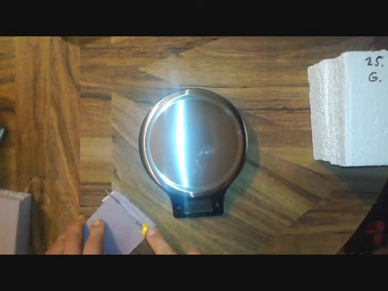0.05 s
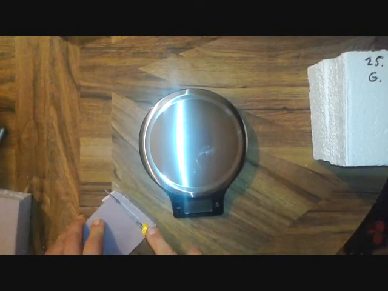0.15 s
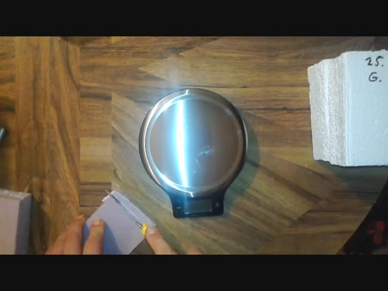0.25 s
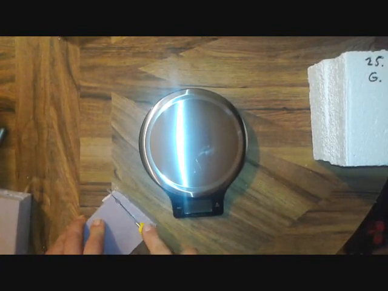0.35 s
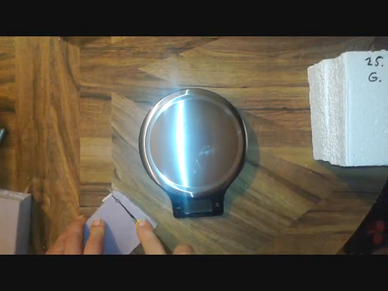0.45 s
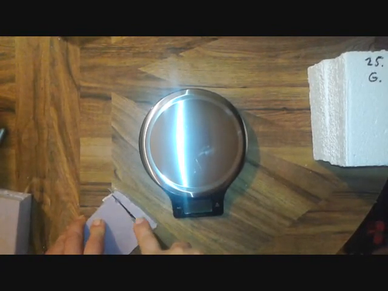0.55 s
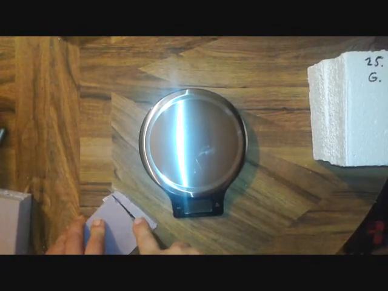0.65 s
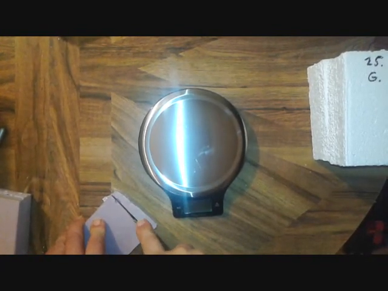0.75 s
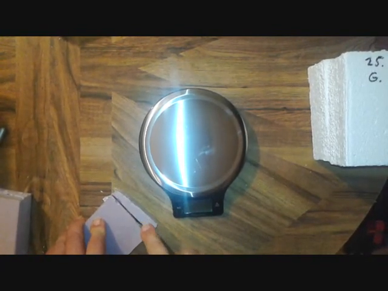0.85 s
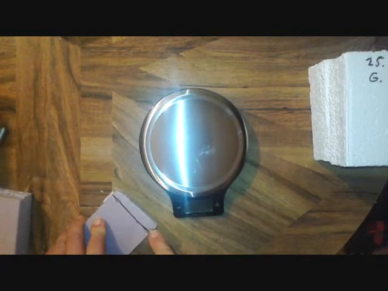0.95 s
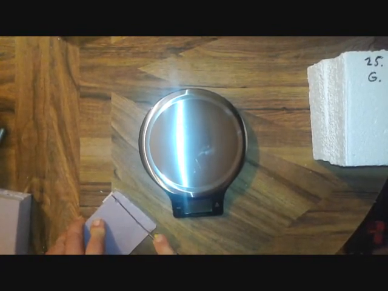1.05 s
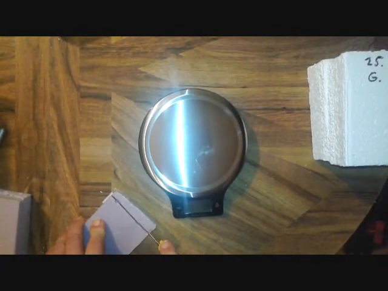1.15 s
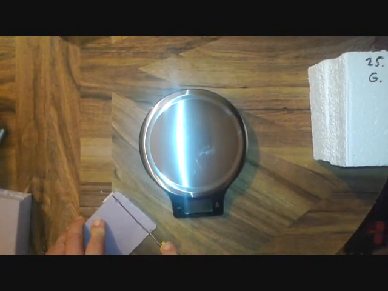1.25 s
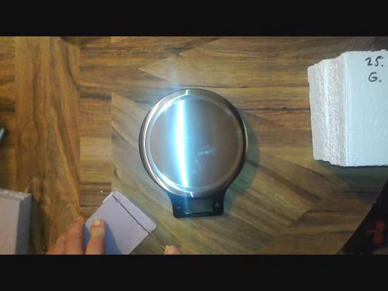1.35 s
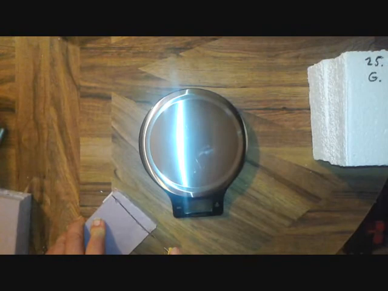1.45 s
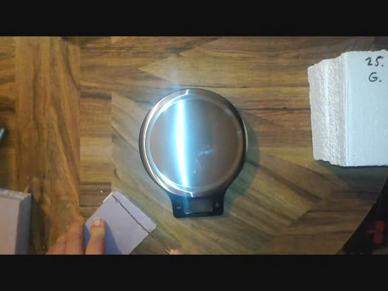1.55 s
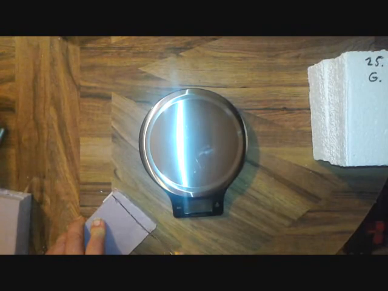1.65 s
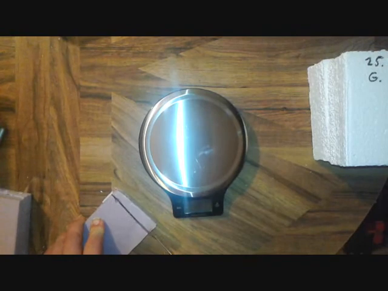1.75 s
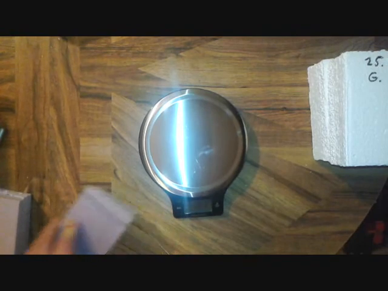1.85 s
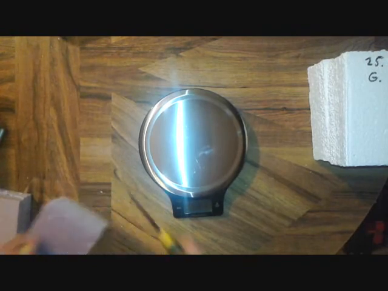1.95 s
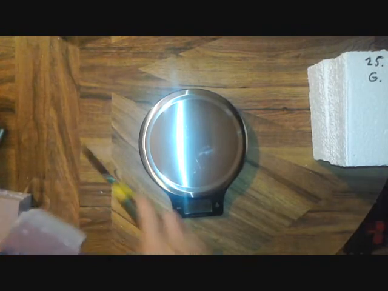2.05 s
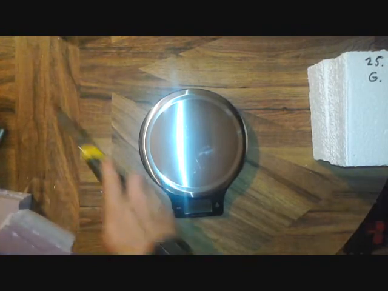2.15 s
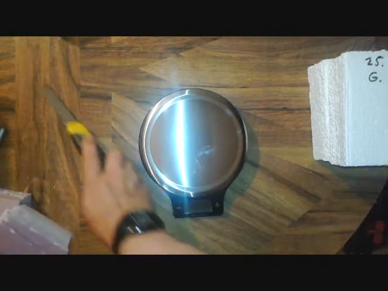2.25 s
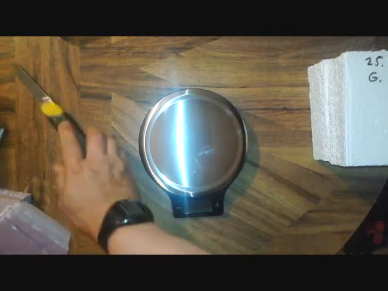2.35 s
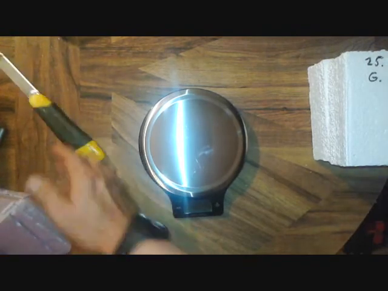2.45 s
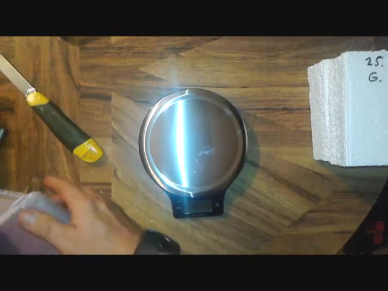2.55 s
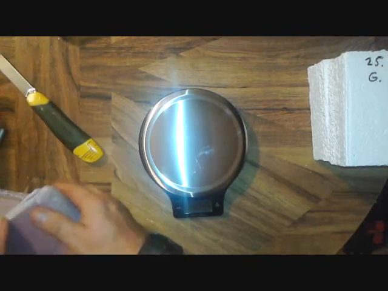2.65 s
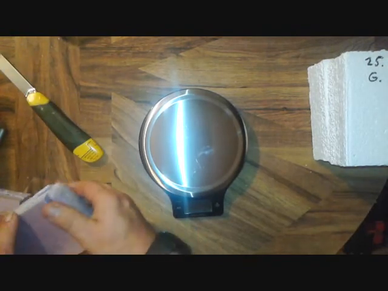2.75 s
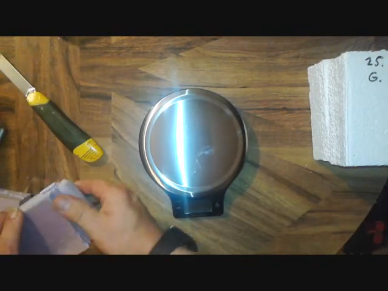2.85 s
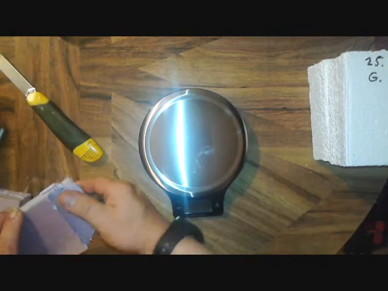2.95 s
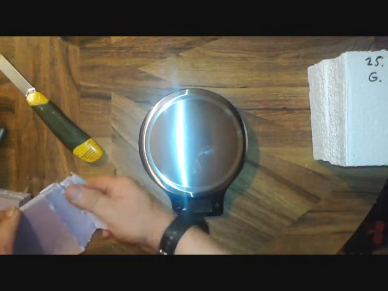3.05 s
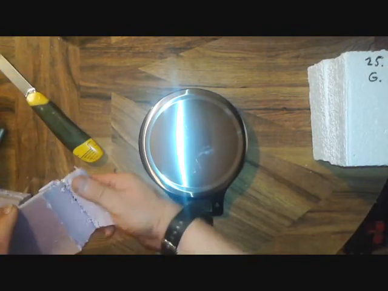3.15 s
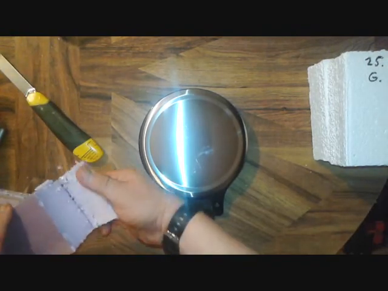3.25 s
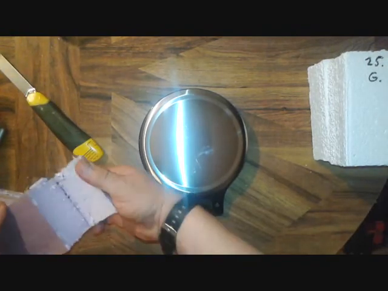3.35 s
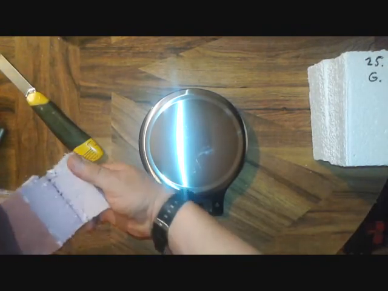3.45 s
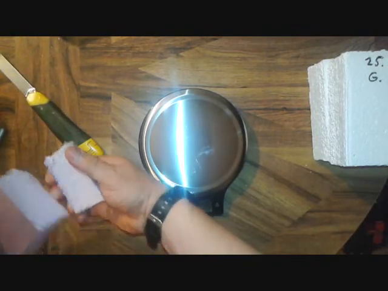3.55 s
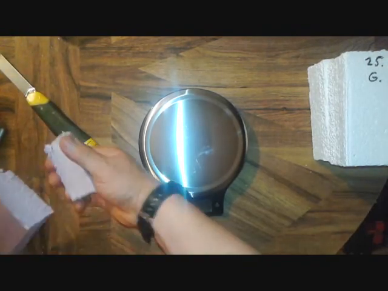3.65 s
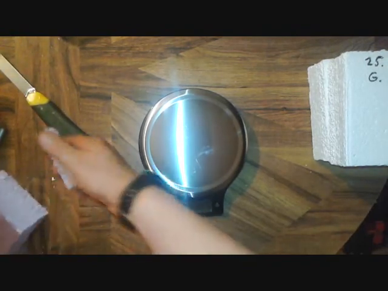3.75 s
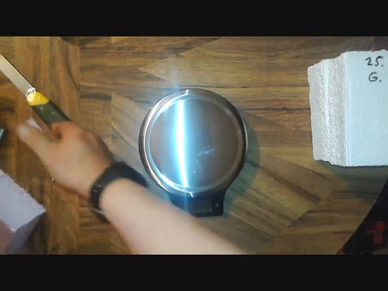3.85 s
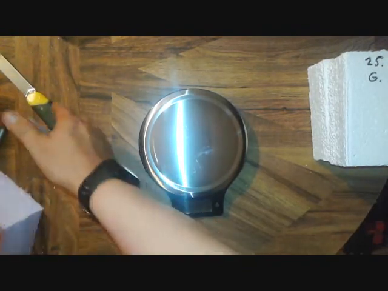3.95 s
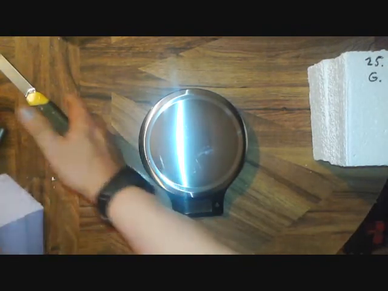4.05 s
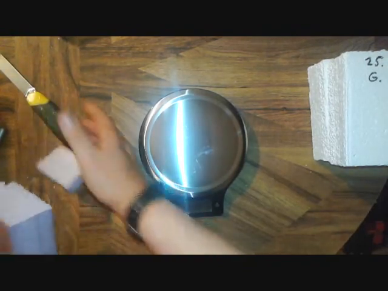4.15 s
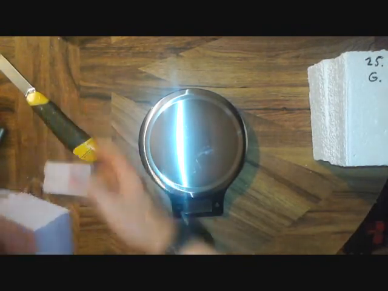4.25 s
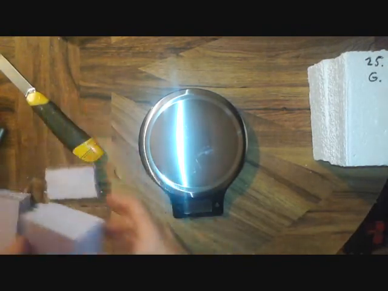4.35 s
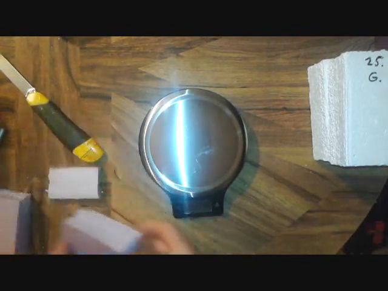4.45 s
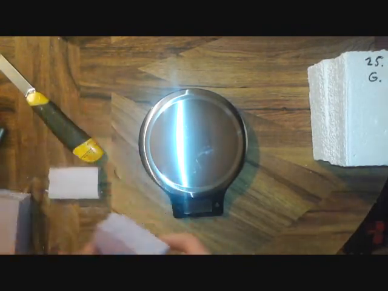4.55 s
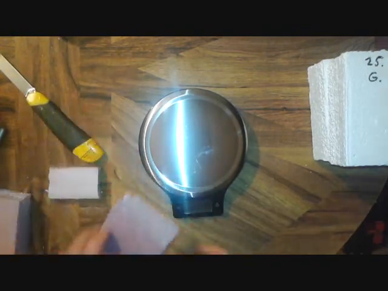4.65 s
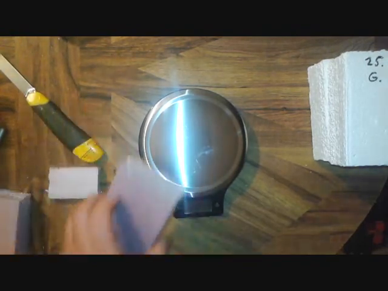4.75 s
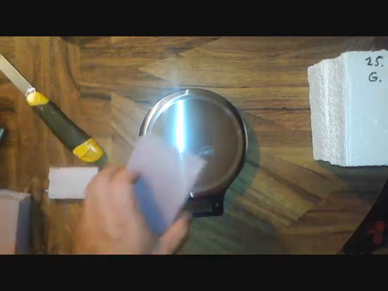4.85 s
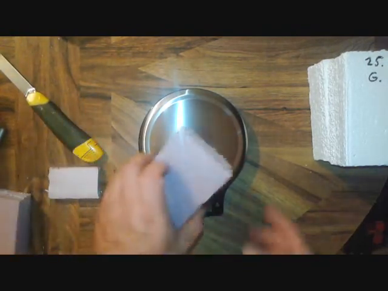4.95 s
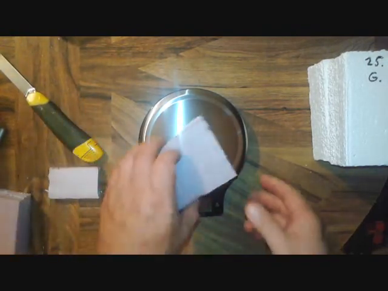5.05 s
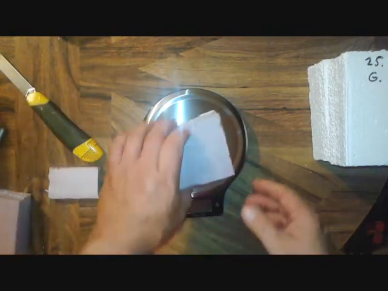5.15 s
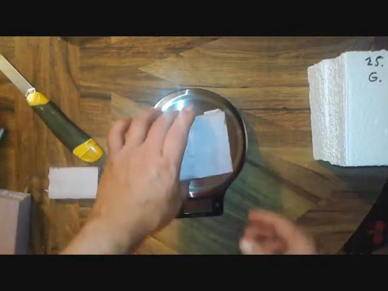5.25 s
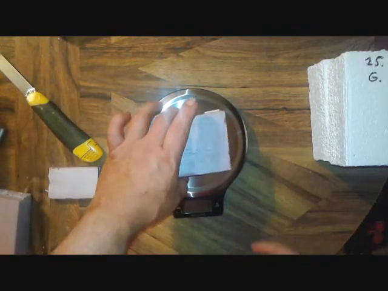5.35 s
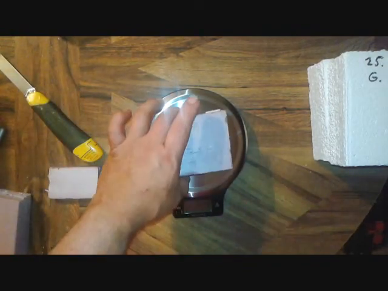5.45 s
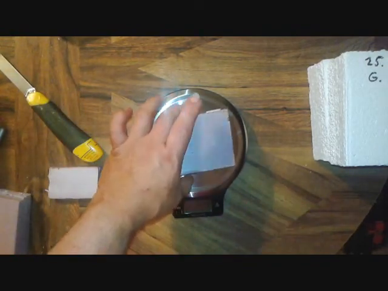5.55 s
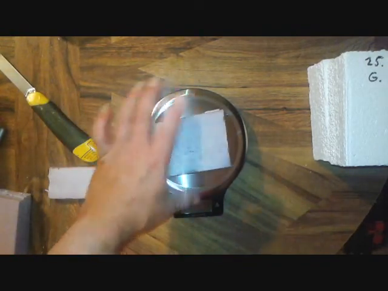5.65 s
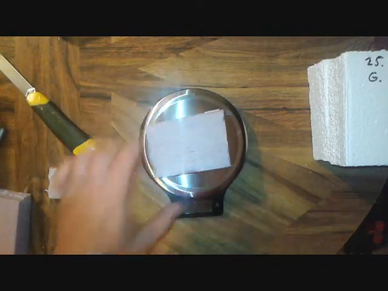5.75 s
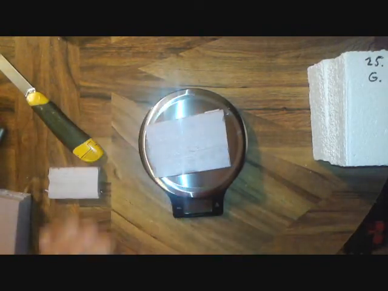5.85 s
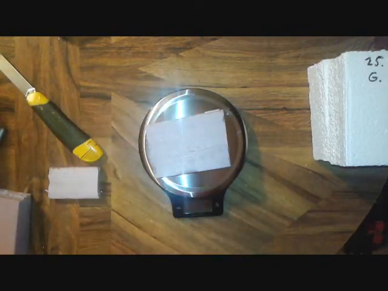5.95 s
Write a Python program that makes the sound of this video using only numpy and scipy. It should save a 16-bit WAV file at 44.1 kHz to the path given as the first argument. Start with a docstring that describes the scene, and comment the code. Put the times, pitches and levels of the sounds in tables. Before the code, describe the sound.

Gritty foam cutting with small crackles, a hard knife clatter on wood, sharp breaking snaps, soft rubbing, and a final clack on a kitchen scale.

```python
"""Wooden table, small room: a utility knife is pulled three times through a dense foam block and laid down with
a clatter; hands snap the slice off, put it aside and drop the block on a glass-topped kitchen scale. Bursting cells
excite foam resonances and snap as short noise bursts; blows ring modes of table, glass, slice, block and scale.
Changing noise echoes answer over a faint hiss; two microphone ports sit above, right of the work."""
import sys
import numpy as np
from scipy import signal
from scipy.fft import rfft, irfft
from scipy.io import wavfile
from scipy.ndimage import uniform_filter1d

SR = 44100
rng = np.random.default_rng(int(sys.argv[2]) if len(sys.argv) > 2 else 0)


def pcm_store(signal):
    """Save signal as 16-bit PCM."""
    levels = np.round(np.clip(np.atleast_2d(signal), -1, 1) * 32767)
    wavfile.write(sys.argv[1], SR, levels.astype(np.int16).T)


N = 264581
T_S = np.arange(N) / SR

# room tone and hiss spectrum: f/Hz, relative density/dB
AIR_SPECTRUM = [(18, -48), (30, -17.5), (89, -6.5), (102, -13.5), (122, -9), (211, -10), (337, -11.5),
                (437, -20), (1830, -26.5), (13900, -32.5), (15000, -40)]
AIR_DB = -68
# where the hands work: t/s, left port delay/ms, left minus right/dB
PLACE = [(0, 0.07, 0), (1.9, 0.13, 0), (2.498, .16, -1.3), (3.598, 0.15, -0.5), (4.199, .18, -1),
         (4.7, 0.17, 0), (5.7, 0.018, 2), (6, 0.019, -1.5)]
SHADE_DB = -2.5  # left port above 7.8 kHz: turned away
EARLY_DB, EARLY_T60_S = -7, .015
ROOM_DB, ROOM_T60_S, ROOM_TOP_HZ = -4, .13, 7000
TOP_HZ = 14550

# blows on the table: t/s, relative level/dB
TABLE_BLOWS = [(0.233, -43), (1.05, -58), (1.885, -38), (2.398, -37.5), (2.534, -33), (2.556, -8.5),
               (2.566, -12), (2.578, -17), (2.599, -20.5), (2.64, -22), (2.669, -29.5)]
TABLE_CONTACT_MS = .4
# table modes: f/Hz, relative level/dB, t60/s
TABLE_MODES = [(153, -5, .45), (188, -19, .35), (263, -4, .15), (322, -8, .1), (348, -3, .17),
               (407, -6, .1), (443, 0, .16), (513, -1, .12), (590, -3, .08), (700, -24, .4), (846, -4, .07),
               (957, -3, .06), (1120, -6, .07)]
# close pair of the scale's glass plate, humming along: f/Hz, relative level/dB, t60/s
GLASS_MODES = [(536, -16, 1.1), (548.5, -17, .9)]
# block lands on the scale: t/s, relative level/dB, contact/ms
SCALE_BLOWS = [(5.745, -31, 0.71), (5.78, -14.5, 0.059), (5.853, -32.5, 0.13)]
# scale modes: f/Hz, relative level/dB, t60/s
SCALE_MODES = [(142, -16, .2), (160, -14, .25), (360, -16, .08), (510, -10, .1), (600, -14, .06),
               (745, -8, .1), (775, -8, .1), (943, -3, .1), (1055, -11, .05), (1230, -11, .04),
               (1833, -12, .06), (2220, -3, .025), (2420, -2, .025), (2660, 1, .03), (3670, -9, .02),
               (4750, -5, .015)]
# cut-off slice put down: t/s, relative level/dB, contact/ms
SLICE_TAPS = [(4.376, -37.5, 0.36), (4.405, -26.5, 0.061), (4.412, -40, 0.13), (4.578, -53, .08)]
# slice modes: f/Hz, relative level/dB, t60/s
SLICE_MODES = [(1240, -8, .045), (1300, -8, .05), (3480, -3, .05), (3560, -2, .05), (4450, -3, .035)]
# block knocks as it is bent and broken: t/s, relative level/dB, contact/ms
BLOCK_KNOCKS = [(3.345, -40.5, 0.33), (3.446, -35, 0.4), (3.475, -30.5, 0.28), (3.664, -40, 0.45),
                (3.703, -39, 0.5), (3.726, -36.5, 0.62), (4.26, -50.5, 0.38), (4.406, -35.5, 0.64),
                (4.646, -41.5, 0.67)]
# block modes: f/Hz, relative level/dB, t60/s
BLOCK_MODES = [(275, -4.5, 0.05), (550, -2.5, 0.028), (750, -0.5, .025)]

# cells snapping, ticks, hard edges of the knife's clatter: t/s, level/dB, f/Hz, treble re tone/dB
CRACKS = [(0.0295, -24.5, 1440, -0.5), (0.0834, -28, 1450, -13), (.1246, -32.5, 2280, -24),
          (0.1312, -32, 1290, -15), (.1471, -22, 3850, -20), (0.1606, -22, 3190, -25),
          (0.2274, -17, 4800, -8), (0.236, -24, 4400, 0), (.2518, -28.5, 4400, 4), (.2613, -32, 2410, -5),
          (0.3536, -33, 2300, -7), (0.4242, -36.5, 2340, -19), (.4324, -28.5, 4120, -22),
          (0.4697, -29, 4160, -17), (0.4862, -29, 2500, -12), (0.5235, -19, 4900, -18),
          (.6482, -23.5, 5060, 2.5), (1.037, -18, 3630, -12), (1.0588, -9, 4700, -16),
          (1.1865, -32, 5040, -4), (1.2462, -18.5, 4660, -9), (1.338, -30, 4630, -15),
          (1.7953, -27.5, 2200, -7), (1.887, -24, 3000, -5), (1.912, -22.5, 2200, -12),
          (1.9546, -12, 4520, -5), (2.0541, -31.5, 4150, -5), (2.18, -38, 3750, -16),
          (2.2091, -26.5, 4130, -4), (2.2189, -28, 2260, -18), (2.4018, -16, 3860, -4.5),
          (2.5323, -21, 3000, -15.5), (2.5567, 2, 2800, -14), (2.578, -3.5, 4940, -10.5),
          (2.5814, -5.5, 3000, -13), (2.6036, -11, 4974, -4), (2.6417, -3, 4266, -13.5),
          (2.8342, -42.5, 1520, -15), (2.8788, -47.5, 4910, 3), (2.8999, -33.5, 4820, -11),
          (3.0186, -36, 3270, -19), (3.0665, -22.5, 2090, -26), (3.1473, -38, 5470, 1),
          (3.1936, -30.5, 5130, 0), (3.2911, -32, 5200, -14.5), (3.3303, -28, 5080, -4),
          (3.355, -32.5, 4390, -7.5), (3.4256, -30.5, 5140, -12.5), (3.4474, -7.5, 5640, -9.5),
          (3.4595, -23, 4540, -14), (3.4693, -2.5, 5120, -5.5), (3.479, -7, 2220, -15),
          (3.504, -27.5, 3420, -9), (3.5128, -25, 4320, -25), (3.6325, -29, 5066, -7),
          (3.6747, -23, 4390, -30), (3.6864, -3.5, 5013, -8.5), (3.7006, -5.5, 2300, -2),
          (3.7048, -5.5, 4667, 0.5), (3.7085, -9, 3460, -11), (3.7299, -6.5, 5634, 3),
          (3.9149, -39, 1810, -18), (3.9446, -25.5, 5190, -18), (4.0916, -49.5, 3850, -12),
          (4.1742, -40.5, 4970, -13), (4.263, -39, 3680, -19), (4.3458, -45, 4390, 7.5),
          (4.3742, -31.5, 3960, -16), (4.4044, -31.5, 3570, -15), (4.4982, -28.5, 3530, -5),
          (4.5065, -26, 3010, -11), (4.546, -36, 5960, -18), (4.5745, -25.5, 5900, -16),
          (4.6196, -32.5, 4500, -15), (4.6697, -27, 6560, -13)]
CRACK_BODY_DB, BODY_DB_PER_OCTAVE = -6, -7  # body re tone at 2 kHz; a higher snap comes from a smaller piece
CRACK_T60_S, T60_HALVES_DB = .04, 25.5  # t60 at -31 dB; a harder snap is drier

# knife handle skids over the wood: t/s, level/dB
SKID = [(2.402, -31.5), (2.44, -37), (2.47, -44.5), (2.52, -38), (2.55, -39.5)]
# handle resonances: f/Hz, width/Hz, relative level/dB
HANDLE = [(3200, 300, -7), (3810, 120, 0), (4300, 250, -7), (5400, 400, -8), (5720, 300, -8)]
# upper foam resonances: f/Hz, width/Hz, relative level/dB
FOAM = [(3360, 1500, 2.5), (4246, 1000, 8.5), (4820, 220, 3), (6600, 1800, -7)]
# deep foam resonances: f/Hz, width/Hz, relative level/dB
FOAM_LOW = [(1270, 970, -1.5), (1920, 2600, -11), (2170, 680, 1)]
# three pulls of the blade, one list each: t/s, level/dB
CUTS = [
    [(.42, -61), (.436, -53), (.515, -51), (.526, -39), (.59, -39.5), (.69, -47.5), (.72, -44.5),
     (.79, -58.5), (.84, -58.5)],
    [(.84, -63), (.88, -49), (1.03, -42.5), (1.062, -31), (1.075, -33.5), (1.15, -38.5), (1.334, -41),
     (1.39, -51), (1.43, -45), (1.566, -41), (1.65, -63.5)],
    [(1.65, -60), (1.716, -46.5), (1.874, -44.5), (1.92, -39.5), (1.946, -60), (1.955, -35.5),
     (2.01, -58.5), (2.09, -68.5)],
]
CUT_TREBLE_DB, CUT_DEEP_DB = -1.5, -11  # cell-wall hiss, deep flexing: re cut level
# fingers, block and table rubbing: t at full level/s, level/dB, rise/s, hold/s, treble re level/dB, deep re level/dB
SCUFFS = [(.004, -58, 0.017, 0.0027, -13, -3), (0.031, -40.5, 0.0063, 0.0037, -28, -6),
          (0.155, -39.5, 0.044, 0.0081, -13, 1), (0.23, -41, 0.053, 0.014, 1.5, -3),
          (.315, -55, .02, .005, -11, -7), (0.37, -68.5, .05, .03, 1, -6),
          (2.132, -68, 0.065, 0.053, -6, 0.5), (2.22, -47, 0.022, .002, 1, -24),
          (2.399, -50, 0.0049, 0.068, -8.5, 8.5), (2.545, -35, 0.052, 0.0025, -21, -8),
          (2.556, -22.5, 0.0042, 0.064, -3.5, -2.5), (2.633, -26.5, 0.022, 0.04, -2, -6),
          (2.756, -65.5, 0.06, 0.074, 1, 1.5), (2.887, -54.5, 0.077, .02, 3, -10.5),
          (3.056, -52.5, 0.23, .005, 1, -11), (3.065, -41, 0.01, 0.0089, 0.5, -34),
          (3.151, -50.5, 0.11, 0.046, 3.5, -14), (3.214, -51, .15, 0.16, 0, -15),
          (3.437, -47.5, .12, .003, 2.5, -10), (3.448, -36, .006, .001, 3, -32),
          (3.471, -28.5, .006, 0.014, -6.5, -13), (3.546, -48.5, .05, 0.038, -4, -10.5),
          (3.651, -52, 0.14, .01, -5.5, -12), (3.7, -29, 0.031, 0.041, -3, -36),
          (3.778, -54, .02, 0.033, -2, -11), (3.944, -52.5, 0.086, .003, -1, -9),
          (4.098, -65, 0.17, 0.074, -4, -7), (4.175, -54.5, .02, 0.009, -3.5, -8),
          (4.263, -62, .03, 0.0043, -20, -5.5), (4.385, -62.5, 0.14, .01, 2, -4.5),
          (4.405, -40.5, 0.0078, .015, -20, -7), (4.497, -50.5, .03, 0.028, -15, -4),
          (4.575, -46.5, .015, .001, -16, -24), (4.668, -49, 0.18, .01, -4, -10),
          (4.707, -62.5, .05, 0.08, -0.5, -6.5), (4.867, -73.5, .05, .08, -8, -5.5),
          (5.07, -64, 0.35, .003, -11, -7), (5.172, -62, 0.084, .01, -3.5, -8.5),
          (5.254, -66, 0.062, 0.021, -3.5, -13.5), (5.743, -52, 0.0028, .003, -3.5, -22),
          (5.774, -57, 0.013, 0.036, -25, -2), (5.861, -59, 0.074, 0.024, -23, 9)]
RISE_DB, SAG_DB_PER_S, RELEASE_DB_PER_S = 26.5, 75, 519.5  # climb within the rise time, fall in hold, fall after
# hands lean on the table: t/s, rumble level at a rub of -44.5 dB/dB
LEAN = [(0, -58), (.6, -59), (.95, -62.5), (1.15, -58), (1.22, -51), (1.36, -55.5), (1.45, -60.5),
        (2.3, -59), (2.7, -52), (3.2, -65), (3.7, -60), (4.5, -58), (5.6, -63.5), (5.8, -43.5), (6, -54.5)]
LEAN_SHARE, HAND_DB = .43, -47  # rumble dB per rub dB; ceiling of the rumble
SPREAD = .93  # share of the rasp that each port hears from a different part of the cut


def undb(db):
    """Amplitude ratio of a dB value."""
    return 10 ** (np.asarray(db) / 20)


def unit(x):
    """Scale to rms 1."""
    return x / np.sqrt(np.mean(x ** 2))


def band(x, hz, width_hz):
    """Resonant band-pass, gain 1 at the centre."""
    return signal.lfilter(*signal.iirpeak(hz, hz / width_hz, fs=SR), x)


def above(x, hz):
    """Third-order high-pass."""
    return signal.sosfilt(signal.butter(3, hz, "high", fs=SR, output="sos"), x)


def below(x, hz):
    """Second-order low-pass."""
    return signal.sosfilt(signal.butter(2, hz, fs=SR, output="sos"), x)


def fade(t60_s, seconds):
    """Exponential decay, -60 dB at t60."""
    return np.exp(-np.log(1000) * np.arange(int(seconds * SR)) / SR / t60_s)


def walk(rate_hz):
    """Random levels, one per 1 / rate, slewed; rms 1."""
    step = int(SR / rate_hz)
    levels = np.repeat(rng.standard_normal(N // step + 1), step)
    return unit(uniform_filter1d(levels, step)[:N])


def curve(rows):
    """Gain of the dB column over time; silent outside the table."""
    t_s, db = np.transpose(rows)
    inside = (T_S >= t_s[0]) & (T_S <= t_s[-1])
    return np.where(inside, undb(np.interp(T_S, t_s, db)), 0)


def add(out, t_s, x):
    """Mix x in at t_s."""
    i = int(t_s * SR)
    out[i:i + len(x)] += x[:max(N - i, 0)]


def ring(force, modes):
    """Each mode is a decaying two-pole resonator; signs alternate."""
    out = np.zeros(N)
    for k, (hz, db, t60_s) in enumerate(modes):
        r = np.exp(-np.log(1000) / (t60_s * SR))
        w = 2 * np.pi * hz / SR
        mode = signal.lfilter([0, np.sin(w)], [1, -2 * r * np.cos(w), r * r], force)
        out += (-1) ** k * undb(db) * mode
    return out


def blows(rows, modes, gain_db):
    """Raised-cosine pushes, longer for softer contact, ring the body."""
    force = np.zeros(N)
    for t_s, db, contact_ms in rows:
        push = np.hanning(int(contact_ms * SR / 1000) + 3)
        add(force, t_s, undb(db + gain_db) * push / push.sum())
    return ring(force, modes)


def resonate(x, modes, flicker_db):
    """Parallel resonances with independently flickering levels; rms 1."""
    parts = [undb(db + flicker_db * walk(25.052)) * band(x, hz, width_hz) for hz, width_hz, db in modes]
    return unit(sum(parts))


def air():
    """Room tone and microphone hiss: shaped noise, mostly unrelated at the ports, gently wavering."""
    hz = np.fft.rfftfreq(N, 1 / SR)
    shape_hz, shape_db = np.transpose(AIR_SPECTRUM)
    shape = undb(np.interp(np.log(hz + 1), np.log(shape_hz), shape_db))
    noise = rng.standard_normal((2, N)) + .23 * rng.standard_normal(N)
    return undb(AIR_DB + walk(12)) * unit(irfft(rfft(noise) * shape, N))


def ports(x):
    """Sound reaches the right port first; table top and walls send each port its own noise-like echoes."""
    t_s, late_ms, pan_db = np.transpose(PLACE)
    late = np.round(np.interp(T_S, t_s, late_ms) * SR / 1000).astype(int)
    pan = undb(np.interp(T_S, t_s, pan_db) / 2)
    left = x[0, np.clip(np.arange(N) - late, 0, N - 1)] * pan
    left = left - (1 - undb(SHADE_DB)) * (left - below(left, 7800))
    direct = np.array([left, x[1] / pan])

    early, tail = fade(EARLY_T60_S, .25), fade(ROOM_T60_S, .25)
    early = undb(EARLY_DB) * early / np.linalg.norm(early)
    tail = undb(ROOM_DB) * tail / np.linalg.norm(tail)
    hop = SR // 10
    window = np.sin(np.pi * np.arange(2 * hop) / (2 * hop))
    direct = np.pad(direct, ((0, 0), (hop, 2 * hop + len(tail))))
    out = direct.copy()
    # hands and block keep moving: new echo pattern every 0.1 s, crossfaded
    for i in range(0, N + hop, hop):
        field = rng.standard_normal((2, len(tail)))
        echo = early * field + tail * below(field, ROOM_TOP_HZ)  # walls swallow the treble
        echo -= .9 * below(echo, 700)  # thins the lows: long waves reach both ports alike
        wet = signal.fftconvolve(direct[:, i:i + 2 * hop] * window, echo, axes=1)
        out[:, i:i + wet.shape[1]] += wet
    return out[:, hop:hop + N]


def table():
    """Table blows ring the wood and, more faintly, the scale's glass plate."""
    hits = [(t_s, db, TABLE_CONTACT_MS) for t_s, db in TABLE_BLOWS]
    wood = above(above(blows(hits, TABLE_MODES, -10), 160), 160)
    return wood + blows(hits, GLASS_MODES, -14.5)


def slice_taps():
    """The slice rings briefly as it is put down."""
    return blows(SLICE_TAPS, SLICE_MODES, 0)


def block_knocks():
    """Bending and breaking knock the block's dull, short modes."""
    return above(blows(BLOCK_KNOCKS, BLOCK_MODES, -3.5), 140)


def scale_ring():
    """The landing block rings the scale's modes."""
    return above(blows(SCALE_BLOWS, SCALE_MODES, -10), 140)


def scale_clack():
    """Hard edge of the scale blows: a short broad noise crack, weaker for soft contact."""
    out = np.zeros(N)
    for t_s, db, contact_ms in SCALE_BLOWS:
        burst = rng.standard_normal(int(.1 * SR)) * fade(.047, .1)
        edge = band(below(burst, 4180), 1720, 4100)
        add(out, t_s, undb(db) * np.sqrt(.078 / contact_ms) * edge)
    return out


def cracks():
    """Each snap is a click and a dying burst: foam resonance, broad skirt, treble spit, lower body."""
    out = np.zeros(N)
    for t_s, db, hz, treble_db in CRACKS:
        body_db = CRACK_BODY_DB + BODY_DB_PER_OCTAVE * np.log2(hz / 2000)
        t60_s = CRACK_T60_S * .5 ** ((db + 31) / T60_HALVES_DB)
        envelope = fade(t60_s, .1) + 3.5 * fade(.006, .1)  # dying burst + click
        burst, other = rng.standard_normal((2, int(.1 * SR))) * envelope
        tone = above(band(burst, hz, .2 * hz) + .4 * band(burst, 4200, 3500), .5 * hz)
        spit = above(burst, 6500)
        body = above(band(other, 2100, 1300), 1000)
        tone, spit, body = (part / np.abs(part).max() for part in (tone, spit, body))
        add(out, t_s, undb(db) * (tone + undb(treble_db) * spit + undb(body_db) * body))
    return out


def tearing(rate_hz, scatter_db):
    """Cells burst as impulses at random moments with very unequal sizes; rms 1."""
    chance, luck = rng.random((2, N))
    size = rng.standard_normal(N) * undb(-scatter_db * np.log(luck + 1e-9))
    return unit((chance < rate_hz / SR) * size)


def effort():
    """Gains of rasp, treble hiss, deep flexing: scuffs rise, sag while held, let go; powers add."""
    cut = sum(curve(rows) for rows in CUTS)
    power = np.outer(undb([0, CUT_TREBLE_DB, CUT_DEEP_DB]), cut) ** 2
    for t_s, db, rise_s, hold_s, treble_db, deep_db in SCUFFS:
        before = np.maximum(t_s - T_S, 0)
        after = np.maximum(T_S - t_s, 0)
        held = np.minimum(after, hold_s)
        drop_db = RISE_DB * before / rise_s + SAG_DB_PER_S * held + RELEASE_DB_PER_S * (after - held)
        near = drop_db < 60
        power[:, near] += np.outer(undb([0, treble_db, deep_db]), undb(db - drop_db[near])) ** 2
    return np.sqrt(power)


def rubbing():
    """Stick and slip: bursting cells excite the block, thin cell walls hiss, pressure shakes the table."""
    level, bright, deep = effort()
    common = tearing(8000, 2.4)
    slip = undb(1.1 * walk(45) + 3.2 * walk(160))
    apart = np.array([np.roll(common, N // 3), np.roll(common, N // 2)])
    cells = slip * (np.sqrt(1 - SPREAD) * common + np.sqrt(SPREAD) * apart)
    # time-shifted cells: unrelated in phase
    deeper, walls = np.roll(cells, N // 5, axis=1), np.roll(cells, N // 7, axis=1)

    rasp = level * above(resonate(cells, FOAM, 3.77), 1800)
    flexing = deep * above(resonate(deeper, FOAM_LOW, 1), 530)
    skid_gain = curve(SKID)
    body = (rasp + flexing) * np.where(skid_gain > 0, .5, 1)  # one hand has left the foam
    hiss = bright * unit(band(above(walls, 6700), 10000, 11000))
    skid = skid_gain * resonate(walls, HANDLE, 1.9)

    low = unit(band(below(common, 830), 150, 390))
    shake = unit(.51 * unit(band(common, 350, 15)) + low + .15 * unit(band(common, 550, 720)))
    press = curve(LEAN) * (level / undb(-44.5)) ** LEAN_SHARE
    rumble = above(np.minimum(press, undb(HAND_DB)) * shake, 68)
    return body + hiss + rumble + skid


def scene():
    """Half the table ring goes through the room; half fills both ports alike."""
    wood = table()
    blows_on_top = slice_taps() + block_knocks() + scale_ring() + scale_clack()
    work = .5 * wood + blows_on_top + cracks() + rubbing()
    return air() + .5 * wood + ports(work)


def record(dry):
    """The recorder rounds the loudest peaks and cuts the top steeply."""
    rounded = .9 * np.tanh(dry / .9)
    return signal.sosfilt(signal.ellip(10, .3, 75, TOP_HZ, fs=SR, output="sos"), rounded)


dry = scene()
out = record(dry)
pcm_store(out)
```